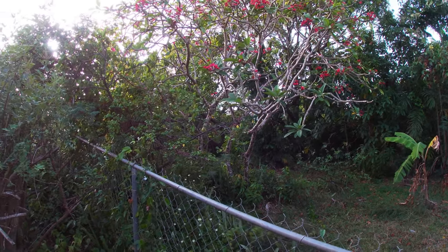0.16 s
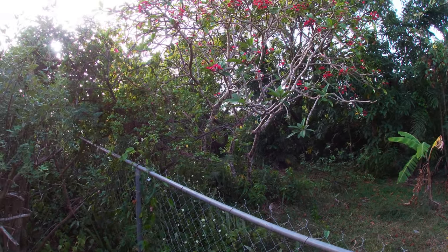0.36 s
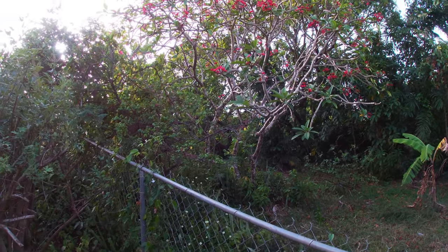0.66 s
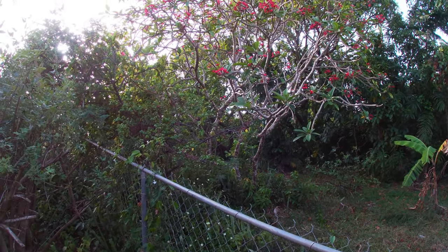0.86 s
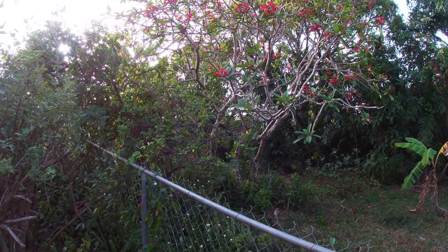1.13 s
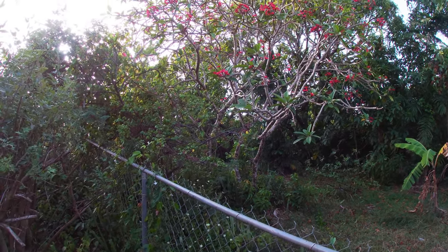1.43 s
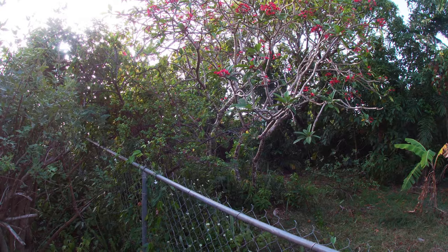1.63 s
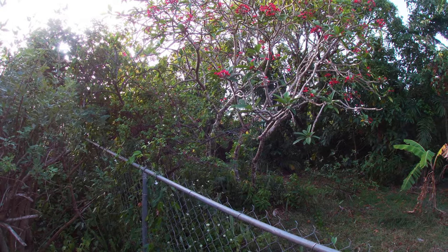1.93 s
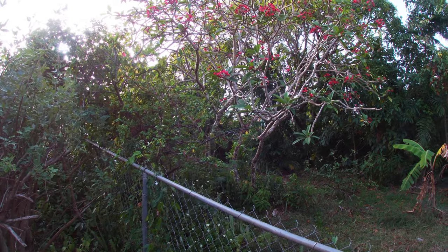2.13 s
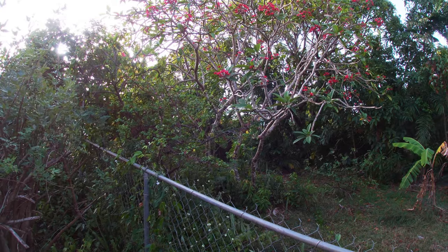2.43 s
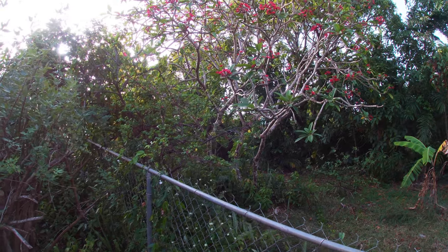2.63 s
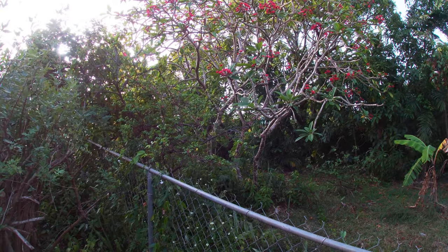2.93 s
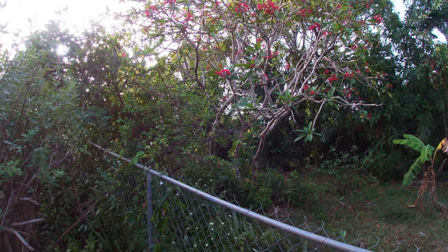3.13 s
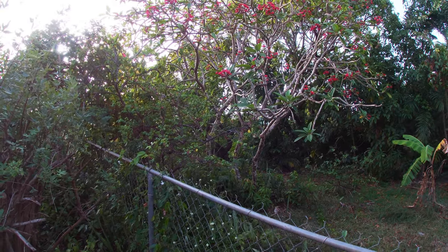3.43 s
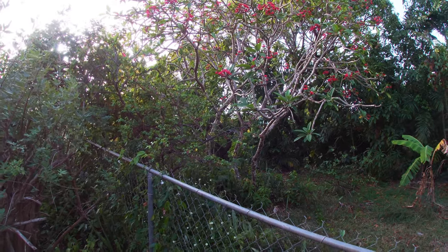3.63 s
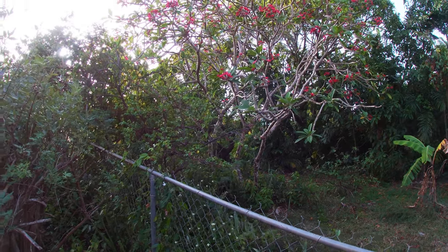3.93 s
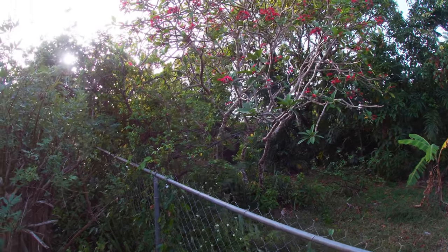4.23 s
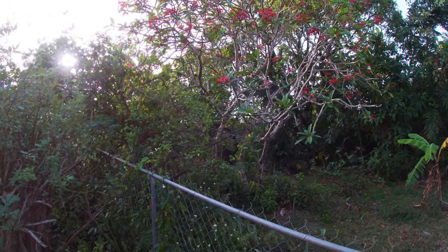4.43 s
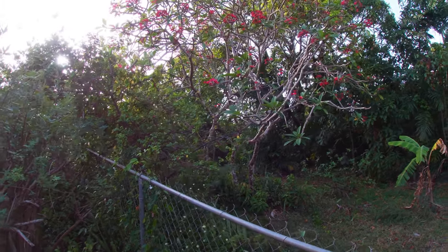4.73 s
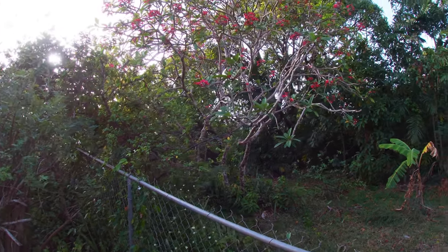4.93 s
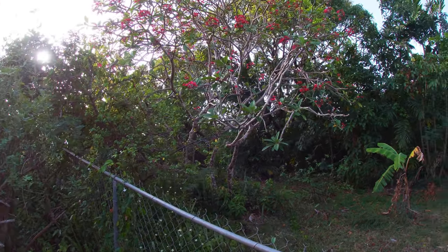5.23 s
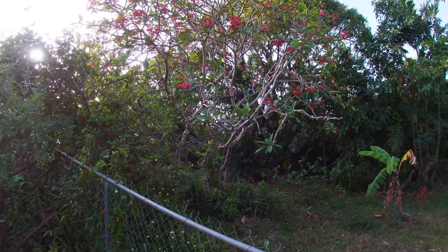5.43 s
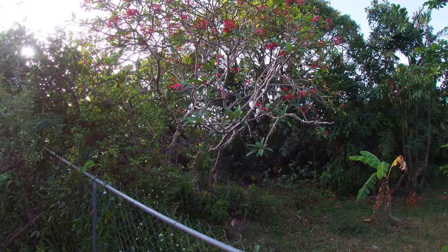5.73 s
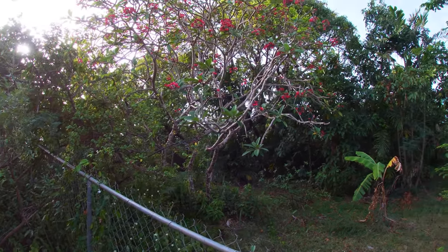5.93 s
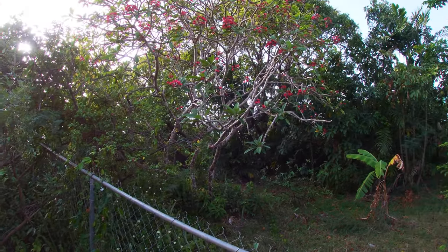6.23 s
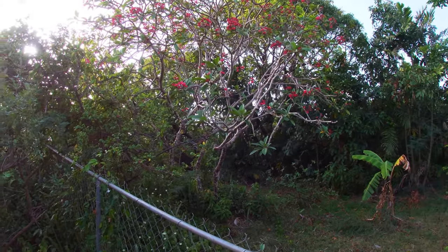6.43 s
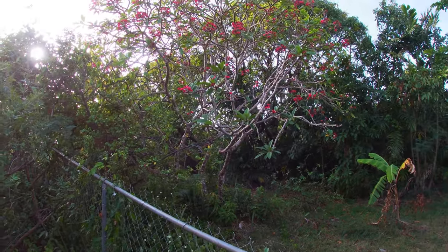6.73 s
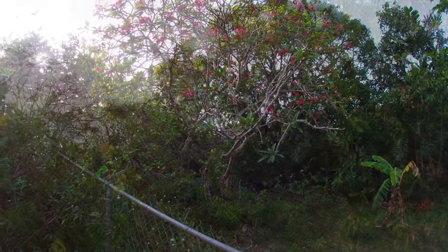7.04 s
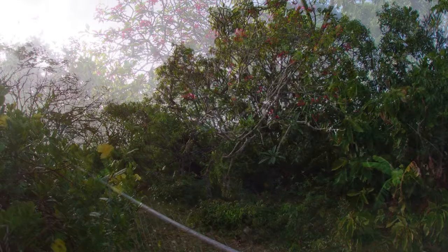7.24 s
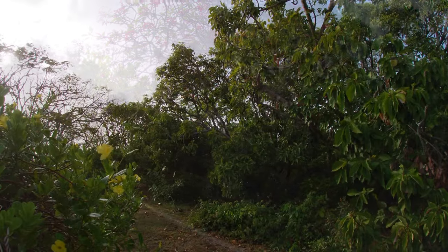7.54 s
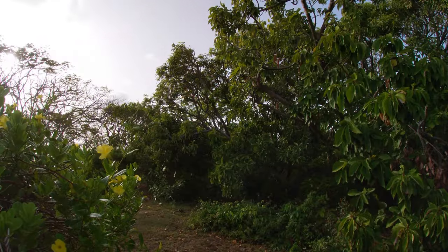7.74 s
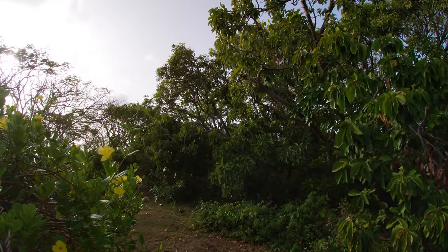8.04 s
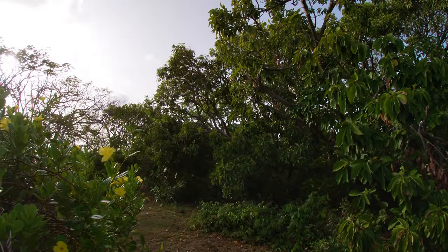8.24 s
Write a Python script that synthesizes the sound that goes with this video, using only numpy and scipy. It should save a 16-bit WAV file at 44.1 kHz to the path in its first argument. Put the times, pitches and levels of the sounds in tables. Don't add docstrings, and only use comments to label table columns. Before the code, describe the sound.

Outdoors in a leafy garden, a nearby monkey chatters in quick, hoarse, falling syllables while a duller caller answers from farther off. Short high clucks cut between bouts. Echoes from trees and a wall smear each call. Later the bouts grow sparse and darker, breeze and distant chorus swell, and two soft grunts and small bird whistles close it. Low traffic hum and tiny regular camera ticks run throughout, close to the microphone.

```python
import sys
import numpy as np
from scipy import signal
from scipy.fft import rfft, irfft, next_fast_len
from scipy.io import wavfile
from scipy.ndimage import uniform_filter1d, minimum_filter1d, map_coordinates

SR = 44100
rng = np.random.default_rng(int(sys.argv[2]) if len(sys.argv) > 2 else 0)


def master(y):
    cut = np.clip(np.atleast_2d(y).T, -1, 1)
    pcm = np.round(cut * 32767)
    wavfile.write(sys.argv[1], SR, pcm.astype(np.int16))


def nominal_scale(level):
    x = np.asarray(level, float) / 20
    return 10 ** x


N = 369116


def unit(x):
    return x / np.sqrt(np.mean(x ** 2) + 1e-20)


def along(points, hz):
    f, v = np.transpose(points)
    return np.interp(np.log(hz + 1), np.log(f + 1), v)


def curves(rows):
    s, *cols = np.transpose(rows)
    return [np.interp(np.arange(N) / SR, s, c) for c in cols]


def wobble(rate):
    knots = rng.standard_normal(int(N * rate / SR) + 4)
    return map_coordinates(knots, [np.arange(N) * rate / SR])


def filtered(x, response):
    m = next_fast_len(N + SR // 2)
    return irfft(rfft(x, m) * response(np.fft.rfftfreq(m, 1 / SR)), m)[..., :N]


def shaped(x, points):
    return unit(filtered(x, lambda hz: nominal_scale(along(points, hz))))


def rings(modes):
    def response(f):
        total = 0
        for k, (centre, width, db) in enumerate(modes):
            band = 1j * f * width / (centre * centre - f * f + 1j * f * width)
            total = total + (-1) ** k * nominal_scale(db) * band
        return total ** 2
    return response


def rush(spectrum, patchy_db):
    z = signal.stft(rng.standard_normal(N), nperseg=512)[2]
    field = uniform_filter1d(rng.standard_normal(z.shape), size=5, axis=0)
    field = uniform_filter1d(field, size=10, axis=1)
    x = signal.istft(z * nominal_scale(patchy_db * unit(field)), nperseg=512)[1][:N]
    return shaped(x, spectrum)


def air(calls):
    # start_s, chorus_db, breeze_db
    swells = [
        (0.0, -43, -44),
        (1.19, -39.5, -51),
        (2.26, -41.5, -50),
        (3.91, -41.5, -48.5),
        (4.78, -41.5, -42),
        (5.55, -38, -40.5),
        (5.83, -32, -31),
        (6.41, -30, -37.5),
        (7.08, -39, -46.5),
        (8.37, -32, -44.5),
    ]
    # freq_hz, level_db
    hum_spectrum = [(15, -74), (25, -36), (49, -19), (102, -24), (135, -7.5), (167, 0.5), (313, -6),
                    (472, -17.5), (600, -19.5), (780, -45), (1320, -120)]
    # freq_hz, level_db
    chorus_spectrum = [(240, -40), (400, -12.5), (475, -11.5), (665, -8.5), (722, -6), (905, -7),
                       (1090, -3), (1300, -0.5), (1570, -12), (3500, -25.5), (4550, -25), (7700, -120)]
    # freq_hz, level_db
    leaf_spectrum = [(1500, -5), (2500, -1), (4000, -5.5), (5500, -6.5), (7300, -8.5), (8500, -17.5),
                     (10300, -15.5), (12000, -29), (14000, -25), (16000, -65)]
    chorus_db, leaves_db = curves(swells)
    hum_db = -42.5 + 0.19 * (leaves_db - leaves_db.mean()) + 1.5 * wobble(7.6)
    hum = nominal_scale(hum_db) * rush(hum_spectrum, patchy_db=1.5)
    stir_db, stir_s = -20, 0.13
    stir = nominal_scale(stir_db) * uniform_filter1d(np.abs(calls), size=int(stir_s * SR))
    chorus = (nominal_scale(chorus_db) + stir) * nominal_scale(1.2 * wobble(5)) * rush(chorus_spectrum, patchy_db=1.3)
    leaves = nominal_scale(leaves_db + 3 + .6 * wobble(9)) * rush(leaf_spectrum, patchy_db=.8)
    return hum + chorus + leaves


def ticks(level_db, t60):
    frame_rate_hz, last_tick_s = 29.99, 8.337
    t = np.arange(SR // 200) / SR
    times = np.arange(last_tick_s, 1 / frame_rate_hz, -1 / frame_rate_hz)
    late, size, tune = rng.standard_normal((len(times), 3)).T
    out = np.zeros(N + SR)
    for s, db, hz in zip(times + .0015 * late, level_db + 2 * size, 10500 + 450 * tune):
        onset = 1 - np.exp(-t / 0.00022)
        out[round(s * SR):][:len(t)] += nominal_scale(db - 60 * t / t60) * np.sin(2 * np.pi * hz * t) * onset
    return out[:N]


def whistles():
    # start_s, length_s, edge_hz, top_hz, level_db
    arches = [
        (7.14, .07, 4300, 5500, -53),
        (7.42, .05, 7040, 7080, -49),
        (7.56, .095, 4200, 5200, -48),
        (8.0, .1, 3900, 4750, -48),
    ]
    hz, gain = np.full(N, 5000.), np.zeros(N)
    for s, long, edge_hz, top_hz, db in arches:
        arch = np.sin(np.linspace(0, np.pi, round(long * SR)))
        hz[round(s * SR):][:len(arch)] = edge_hz + (top_hz - edge_hz) * arch ** .45
        gain[round(s * SR):][:len(arch)] = nominal_scale(db - 2.5) * arch ** .7
    tone = np.sin(2 * np.pi * np.cumsum(hz * (1 + .012 * wobble(150))) / SR)
    return tone * gain * nominal_scale(2 * wobble(80))


def clucks():
    # start_s, peak_db, ring_hz, low_partial_db (relative), air_puff_db (relative)
    calls = [
        (0.407, -10, 2343, -13.5, -1.5),
        (2.127, -6, 2302, -35, -12),
        (3.1228, -6.5, 2306, -26.5, -9.5),
        (4.7728, -1.5, 2372, -23, -12.5),
        (5.6151, -8.5, 2284, -13.5, -2.5),
    ]
    # centre_hz, width_hz, level_db
    breath_rings = [(1240, 350, -5), (2310, 540, 1), (2916, 450, -2), (3770, 400, -6), (4970, 750, -7.5)]
    upper_db, top_hz = 3, 6500
    out, air_puff, t = np.zeros(N + SR), np.zeros(N + SR), np.arange(SR // 10) / SR
    swell = np.sin(np.pi * np.clip(t / .016, 0, 1)) ** 1.3
    late = np.sin(np.pi * np.clip(t / 0.014, 0, 1) ** 1.7)
    for s, db, hz, low_db, puff_db in calls:
        turn = np.pi * hz * np.cumsum(1.01 + 0.203 * np.exp(-t / 0.00323) - 3 * t) / SR
        upper = 0.91 * np.sin(3 * turn) + np.sin(4 * turn)
        tone = np.sin(2 * turn) + nominal_scale(low_db + upper_db) * upper
        lowest = nominal_scale(low_db + 5) * late * np.sin(turn)
        at = round((s - .004) * SR)
        out[at:][:len(t)] += nominal_scale(db - 3.0) * (swell * tone + lowest)
        air_puff[at:][:len(t)] = nominal_scale(db + puff_db - 60 * t / 0.18) * (1 - np.exp(-t / 0.0043))
    breath = unit(filtered(rng.standard_normal(N), rings(breath_rings)))
    return filtered(out[:N] + air_puff[:N] * breath, lambda f: 1 / (1 + 1j * f / top_hz) ** 3)


def folds(pitch_hz, jitter, shimmer_db, hoarse, count=36):
    half = np.pi * np.cumsum(pitch_hz * (1 + jitter * wobble(220))) / SR
    pulses = unit(np.sin((2 * count + 1) * half) / np.sin(half) - 1)
    puffs = unit(rng.standard_normal(N) * (1 + 0.073 * np.cos(2 * half)))
    flutter = wobble(150)
    return [np.sqrt(1 - h) * pulses * nominal_scale(db * flutter) + np.sqrt(h) * puffs for h, db in zip(hoarse, shimmer_db)]


def syllables(rows, voice):
    release_s, top_s, glide_s = 0.04, .015, .03
    overshoot = 1.07
    s, length, top_hz, end_hz, db = np.transpose(rows)
    tied = np.r_[False, s[1:] - (s + length)[:-1] < .012]
    low_at = np.minimum(s + length, np.r_[s[1:] + top_s - glide_s, N])
    knot_s = np.array([s, s + top_s, low_at]).T.ravel()
    knot_hz = np.array([overshoot * top_hz, top_hz, end_hz]).T.ravel()
    keep = ~np.array([tied, 0 * tied, 0 * tied], bool).T.ravel()
    over_db, lost_db, attack_s, grows = np.transpose(voice)[:, :, None]
    gains = np.zeros((len(voice), N))
    for start, long, effort_db in zip(s, length, db):
        at = np.arange(max(0, round(start * SR)), round((start + long) * SR))
        t = at / SR - start
        edge = np.clip(np.minimum(t / attack_s, (long - t) / release_s), 0, 1)
        gains[:, at] += edge * nominal_scale(grows * effort_db + over_db - lost_db * t / long)
    return knot_s[keep], knot_hz[keep], gains


def chatter(callers, throat):
    # centre_hz, width_hz, level_db
    mouth_rings = [(1890, 350, -6.5), (2274, 350, 2.5), (2747, 560, -5.5)]
    # freq_hz, level_db
    rasp_spectrum = [(1500, -20.5), (2900, 4.5), (3700, 4), (4500, -6), (5500, -9.5), (7200, -15.5),
                     (8500, -24.5), (10300, -29), (12500, -35), (16000, -88)]
    # freq_hz, level_db
    chest_spectrum = [(120, -59), (200, -0.5), (330, -5), (620, -5.5), (900, -7), (1300, 2.5), (3000, -77)]
    closing_share = 0.855
    s, hz, gains = zip(*[syllables(rows, voice) for rows, voice in callers])
    pitch_hz = np.interp(np.arange(N) / SR, np.concatenate(s), np.concatenate(hz))
    mouth, closing, edge, neck, body = sum(gains)
    low, mid, high, top = folds(pitch_hz, jitter=.011, shimmer_db=[2, 3, 3, 3], hoarse=[.08, .25, .4, .65])
    open_mouth = rings(mouth_rings)
    rasp = shaped(top, rasp_spectrum)
    rung = (unit(filtered(high, open_mouth)) * mouth + rasp * edge) * nominal_scale(-7)
    rung += unit(filtered(high, lambda f: open_mouth(f / closing_share))) * closing * nominal_scale(-6)
    rung += unit(filtered(mid, rings(throat))) * neck * nominal_scale(-3.5)
    chest = shaped(low, chest_spectrum) * body * nominal_scale(6.0)
    return np.array([rung, chest])


def far_caller():
    # start_s, length_s, top_pitch_hz, end_pitch_hz, effort_db
    answers = [(.185, 0.052, 312.3, 260, -12.5), (.325, 0.06, 323, 210, -13),
               (.83, 0.049, 270.8, 218.6, -17), (1.01, 0.053, 279.9, 200, -20.5),
               (1.22, .06, 220, 190, -46), (1.635, 0.066, 239.7, 189.8, -25.5),
               (2.61, 0.086, 290, 219.5, -23), (3.63, 0.0607, 250, 199.6, -27),
               (3.81, 0.079, 199.5, 168, -36), (5.24, 0.049, 260, 200, -29),
               (6.085, 0.063, 228, 185.8, -26)]
    # over_effort_db, lost_db (through a syllable), attack_s, growth (dB per dB of effort)
    voice = [
        (-39, 3.3, .01, 1.3),
        (-18.5, 2.8, 0.019, 0.52),
        (-30, 3, .01, 0.91),
        (11.5, 35, 0.0077, 1.31),
        (-29.5, 2.7, 0.013, 0.39),
    ]
    # centre_hz, width_hz, level_db
    throat = [(1270, 230, 0)]
    return chatter([(answers, voice)], throat)


def near_callers():
    # start_s, length_s, top_pitch_hz, end_pitch_hz, effort_db
    first_bouts = [(-.012, 0.062, 330, 229.9, -9.5), (.097, 0.072, 379.4, 234, -11.5),
                   (.25, 0.063, 370, 199.3, -12.5), (.545, 0.084, 360.6, 328.7, -11),
                   (.61, 0.079, 340, 262.3, -12), (.735, 0.068, 402.5, 199.3, -14),
                   (.918, 0.07, 358, 205.7, -13.5), (1.12, .07, 359.7, 200.2, -14),
                   (1.315, 0.076, 330, 204.9, -14.5), (1.41, 0.09, 369.8, 185.7, -14),
                   (1.55, 0.071, 341, 189.7, -16), (1.75, 0.081, 325, 179.3, -15.5),
                   (1.903, 0.071, 332.4, 179.1, -15), (2.331, .026, 370.4, 349.9, -19),
                   (2.35, 0.071, 330.3, 290.4, -11.5), (2.405, 0.099, 352.8, 262.7, -11),
                   (2.503, 0.074, 325.4, 223.2, -13), (2.85, 0.081, 315, 200, -14.5),
                   (2.958, 0.08, 345.2, 190.6, -14.5)]
    later_bouts = [(3.219, 0.097, 332.4, 285, -14.5), (3.292, 0.077, 328.8, 191.3, -11.5),
                   (3.395, 0.077, 355.7, 204.9, -13.5), (3.539, 0.068, 328.7, 203.3, -15.5),
                   (3.714, .075, 330.1, 200, -16), (4.254, 0.08, 299.7, 235.9, -16),
                   (4.34, 0.091, 345.2, 214.3, -13.5), (4.443, .085, 346.4, 200, -14),
                   (4.965, 0.081, 290.5, 285, -17), (5.026, 0.077, 317.6, 201.3, -12),
                   (5.139, 0.083, 362.5, 179.2, -15.5)]
    tired_bouts = [(5.784, 0.089, 312.6, 299, -16), (5.847, 0.089, 337.5, 214.6, -15.5),
                   (5.98, 0.067, 334.5, 171.4, -18), (6.3, .09, 320.2, 203.8, -18.5),
                   (6.405, 0.086, 383, 243, -14.5), (6.496, 0.076, 335.8, 187, -15)]
    grunts = [
        (7.452, .065, 241.3, 227.6, -33.5),
        (8.177, 0.049, 255, 232, -28),
    ]
    # over_effort_db, lost_db (through a syllable), attack_s, growth (dB per dB of effort)
    fresh_voice = [(6.5, 7, 0.0055, 0.9845), (-4.5, -8, 0.0097, 1.98), (-2, 6, 0.02, 1.2165),
                   (0.5, 12, 0.0051, 1.13), (-16, 2.5, 0.019, 0.94)]
    tired_voice = [(7, 14.5, .008, 0.9), (0, -5.5, 0.02, 1.094), (-0.5, 8.5, 0.021, 1.17),
                   (1, 11.5, 0.0081, 1.05), (-16.5, 1, 0.019, 0.88)]
    grunt_voice = [(13.5, 13.8, .003, 0.96), (10, 10.1, 0.0035, 1.1), (8.5, 39, 0.0018, 1.06),
                   (-1, 6.35, .004, 1.02), (-6, 2.96, 0.016, 1.04)]
    # centre_hz, width_hz, level_db
    throat = [(863, 180, 0.5), (1169, 370, 2), (1730, 170, 2.5)]
    callers = [(first_bouts + later_bouts, fresh_voice), (tired_bouts, tired_voice), (grunts, grunt_voice)]
    return chatter(callers, throat)


def garden(x, scattered, tail_db):
    # delay_s, level_db
    echoes = [(0.0176, -1.5), (.03, -4.5), (0.041, -7), (.052, -9), (.062, -16.5), (.08, -25), (.092, -18)]
    # freq_hz, t60_s
    tree_decay = [(250, 0.14), (1200, 0.41), (2300, 1), (6000, 0.28), (12000, 0.32)]
    paths, t = np.zeros(SR // 8), np.arange(SR // 200) / SR
    paths[0] = 1
    for delay, db in echoes:
        smear = rng.standard_normal(len(t)) * nominal_scale(-60 * t / 0.0018)
        paths[round(delay * SR):][:len(t)] += nominal_scale(db) * smear / np.linalg.norm(smear)
    out = signal.fftconvolve(x, paths)[:N]
    for start in range(0, N, SR // 2):
        hz, t, z = signal.stft(rng.standard_normal(SR), SR, nperseg=256)
        decay = nominal_scale(-60 * t / along(tree_decay, hz)[:, None])
        tail = signal.istft(z * decay, SR, nperseg=256)[1]
        wet = signal.fftconvolve(scattered[start:start + SR // 2], tail / np.linalg.norm(tail))[:N - start]
        out[start:start + len(wet)] += nominal_scale(tail_db) * wet
    return out


def scene():
    rung, chest = near_callers() + far_caller()
    voices = rung + nominal_scale(-6) * chest + whistles()
    cluck = clucks()
    scattered = voices + nominal_scale(-10) * cluck
    calls = garden(voices + cluck, scattered, tail_db=-7.0) + chest
    return (calls + air(calls) + ticks(level_db=-40.5, t60=.004))[None]


def top_cut(x):
    return signal.sosfilt(signal.butter(12, 14500, fs=SR, output="sos"), x)


def record(dry):
    cut = filtered(dry, lambda hz: (1j * hz / (1j * hz + 90)) ** 2)
    room = np.minimum(1, .93 / (np.abs(cut) + 1e-9))
    gain = uniform_filter1d(minimum_filter1d(room, size=441), size=220)
    return top_cut(cut * gain)


dry = scene()
out = record(dry)
master(out)
```